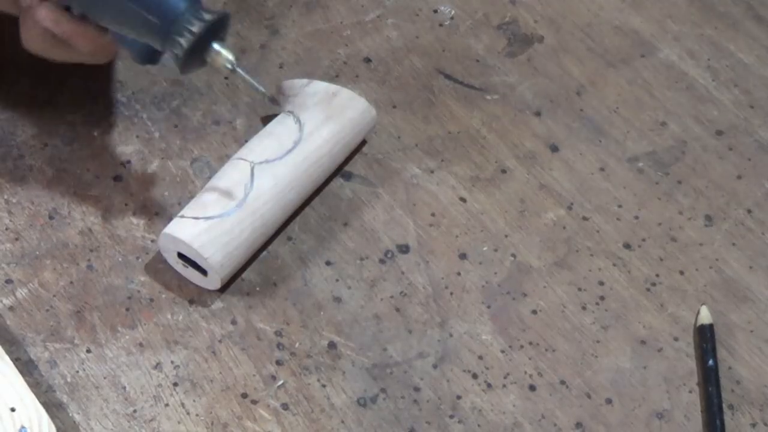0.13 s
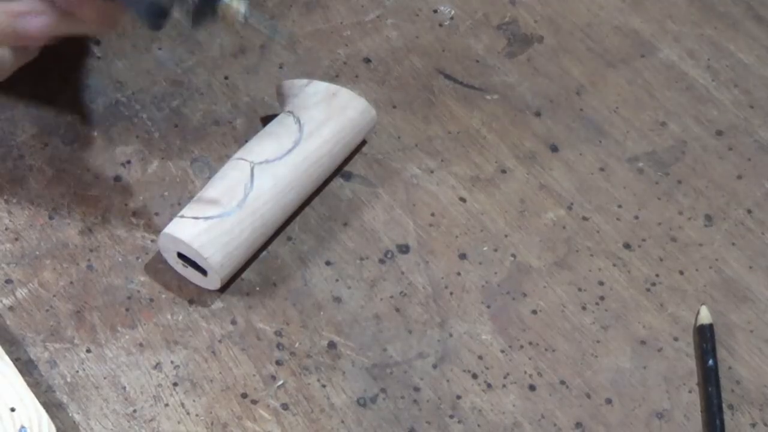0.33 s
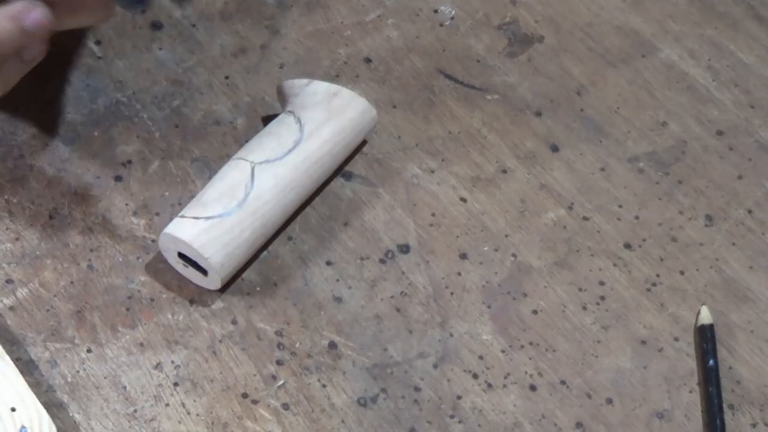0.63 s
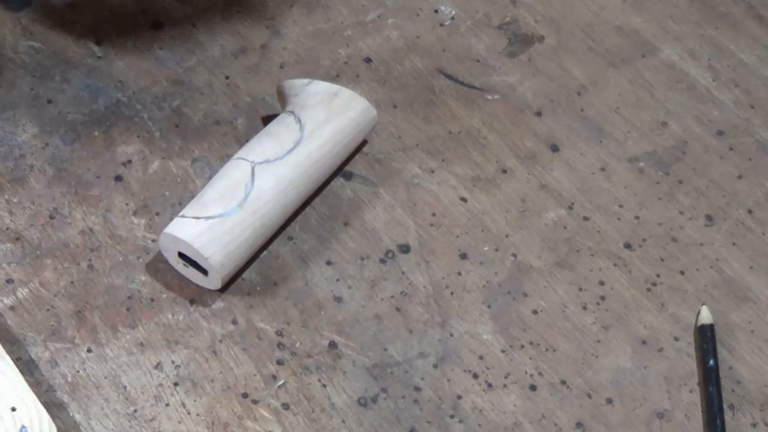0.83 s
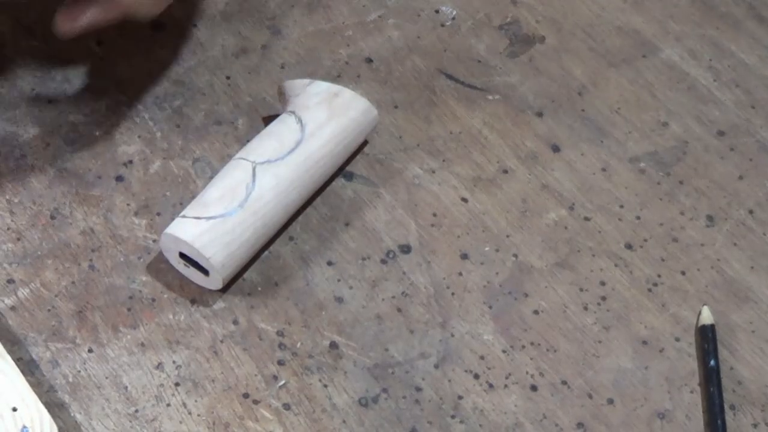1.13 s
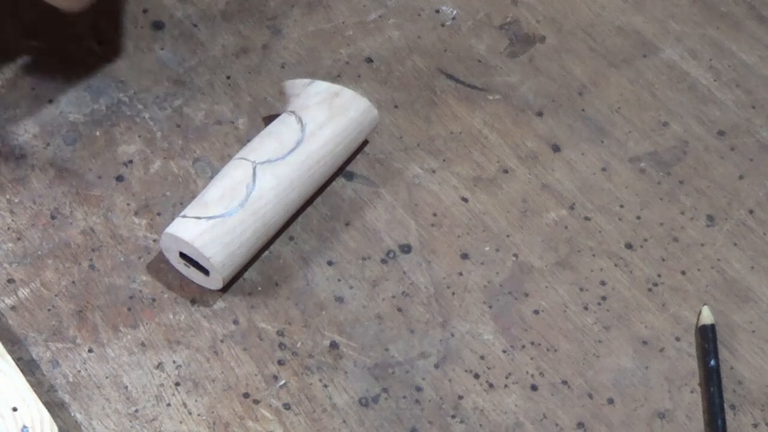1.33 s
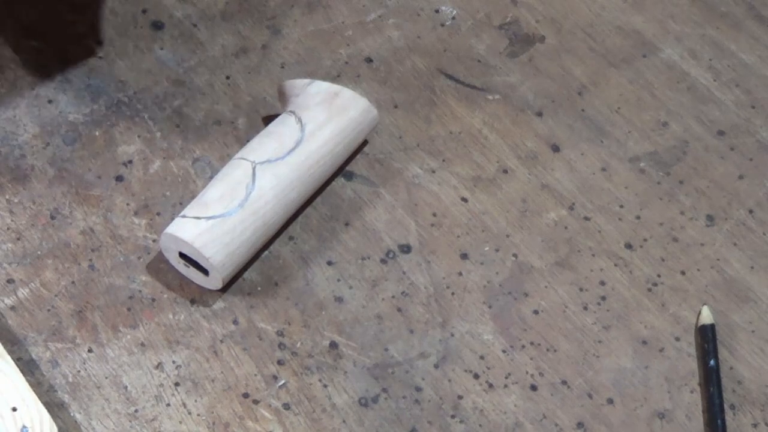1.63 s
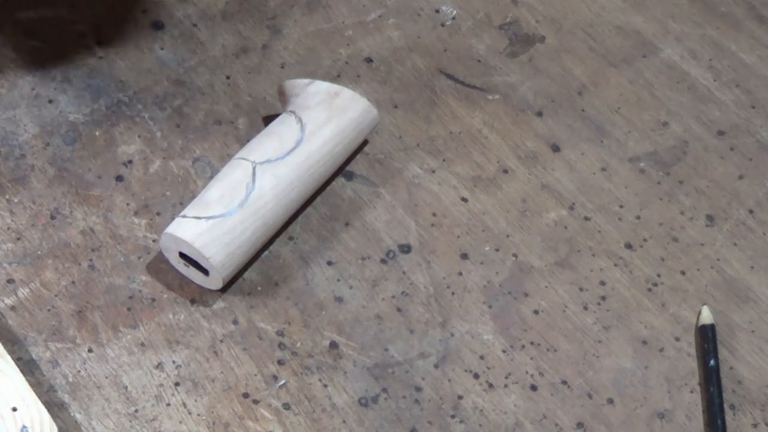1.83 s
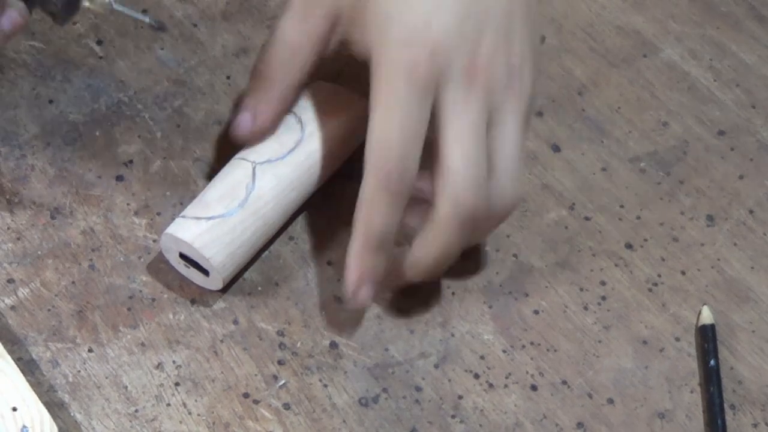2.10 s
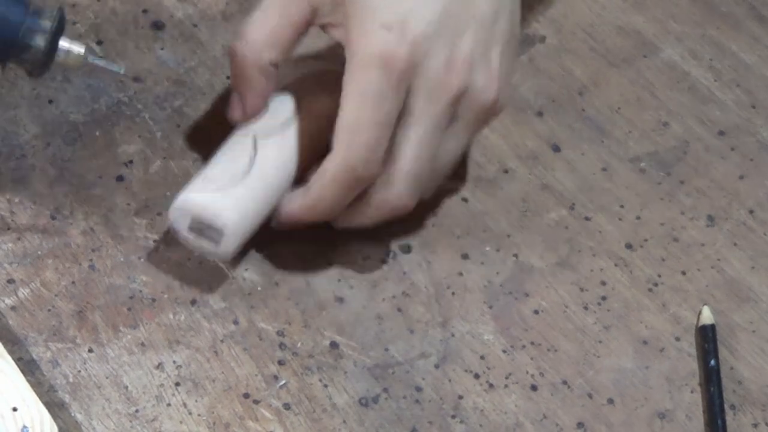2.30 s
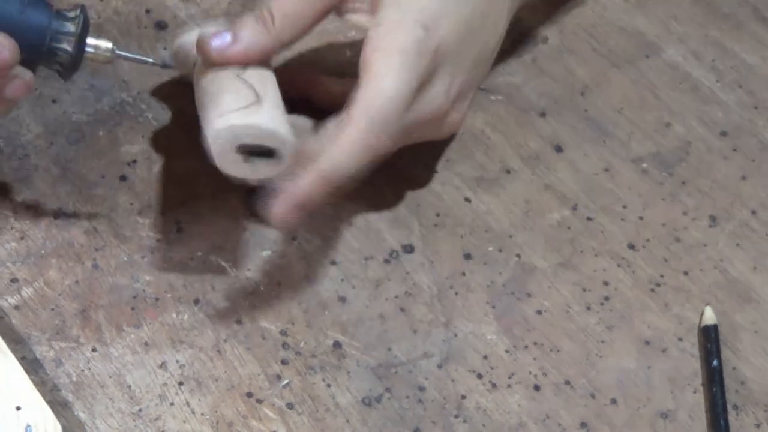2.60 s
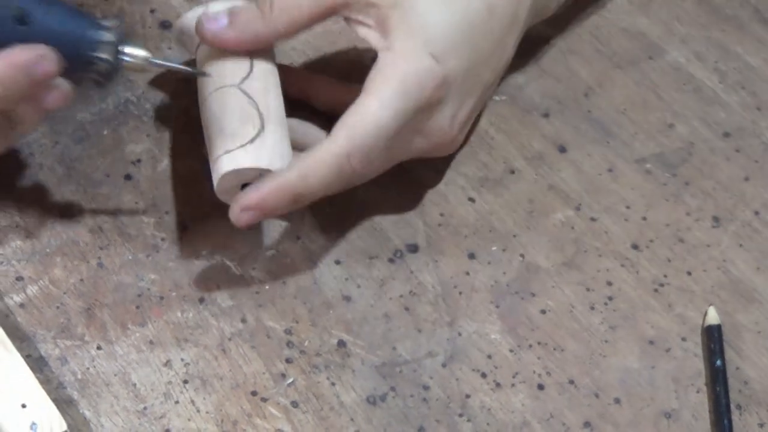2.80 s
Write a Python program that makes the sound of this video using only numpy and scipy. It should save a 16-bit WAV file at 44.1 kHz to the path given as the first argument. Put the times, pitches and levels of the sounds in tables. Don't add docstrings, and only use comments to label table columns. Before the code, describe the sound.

A small handheld rotary tool runs throughout, close and slightly left. Its motor whine climbs fast during the first second, then more slowly towards full speed by 2.9 s, wavering as the grip shifts. Bright fan and brush hiss dominates, with grainy bit chatter coming and going. Around 2.1-2.2 s several dull wooden knocks sound on the bench, a faint tap at 2.3 s. Faint workshop rumble and hum lie beneath.

```python
import sys
import numpy as np
from scipy import signal
from scipy.fft import rfft, irfft
from scipy.io import wavfile
from scipy.ndimage import uniform_filter1d

SR = 44100
rng = np.random.default_rng(int(sys.argv[2]) if len(sys.argv) > 2 else 0)


def output_pcm(signal):
    pcm = np.clip(np.atleast_2d(signal).T, -1, 1) * 32767
    wavfile.write(sys.argv[1], SR, np.round(pcm).astype(np.int16))


def volts_from_db(level):
    exponent = np.asarray(level, float) / 20
    return 10 ** exponent


N = 130095

# (time [s], shaft speed [Hz])
SPEED = [(0, 233.6), (.06, 248), (.14, 260.5), (.22, 272.6), (.31, 288.1), (.43, 299.9), (.59, 319),
         (.78, 330.8), (.93, 339.6), (1.07, 349.2), (1.18, 354.7), (1.4, 363), (1.66, 369.9), (1.91, 377.7),
         (2.23, 382.6), (2.55, 387.7), (2.95, 391.3)]
# (time [s], tool facing the microphones [dB], imbalance in the grip [dB],
# commutator whine [dB], bit chatter [dB], vents turned away [0-1], commutator overtone [dB])
HAND = [(0, -2, -34, -16, -9, 0, -18), (.17, -1, -20, -9, -3, 0.08, -3),
        (.34, -0.5, -11, -3, -1, 0.15, -12), (.55, 0.5, -14, -6, -5, 0.3, -8),
        (.7, 1.2, -9, -4, -8.5, 0.45, -15), (.8, 0.5, -2, -14, -6, 0.4, -8),
        (.9, -0.5, 2.5, -21, -4.5, 0.38, -1.5), (1.05, 1, 0, -1, 0, .7, -7),
        (1.2, 1.5, -10, 1.5, -8, 0.81, 3.5), (1.45, 1, -1.5, -5, -4, 0.68, 2.5),
        (1.9, 1, -1, 1, 1.5, 0.6, 1.5), (2.05, 1.5, -3, 4.5, -14, 0.7, 0.5), (2.38, 0, -2, 2, -4, 0.45, 1),
        (2.5, -1.65, 3, 7, 2, 0.2, 4.5), (2.78, 2, 3.5, 6.5, -1.5, 1, -0.5),
        (2.85, 1.5, 0.5, 3, -6, 0.7, 1.5), (2.95, 0.5, 4, 3, -2, 0.99, -2)]
# (multiple of shaft speed [1], level [dB])
ORDERS = [(3, -51.3), (4, -50), (5, -52.6), (6, -58.0), (7, -54.2), (9, -54.3), (10, -55.5), (11, -51.1),
          (12, -48.8), (13, -51.3), (14, -50.9), (15, -47), (17, -47), (18, -47.1), (19, -44.0),
          (20, -50.7), (21, -51.4), (22, -54), (23, -40.2), (24, -42.8), (25, -50.0), (26, -40.5),
          (27, -42.9), (28, -49.1), (29, -52.7), (30, -45.4), (31, -50.4), (32, -48.6), (33, -48.7),
          (34, -54.1), (35, -50.1), (36, -52.7), (37, -50.8), (38, -51.4), (39, -54.9), (40, -52.2),
          (41, -58.0), (42, -58.0)]
# (multiple of shaft speed [1], level [dB], column of HAND [index])
HELD_ORDERS = [(1, -47.5, 2), (8, -42, 3), (16, -38.5, 6)]
# (time [s], multiple of shaft speed [1], level [dB], half length [s])
FLARES = [(0.02, 22, -38, 0.04), (0.05, 7, -45, 0.08), (0.31, 18, -36.5, 0.11), (0.35, 32, -34.5, 0.07),
          (0.36, 26, -39.8, 0.04), (0.37, 31, -37.5, 0.07), (0.39, 25, -38.1, 0.07),
          (0.42, 28, -35.9, 0.04), (0.55, 17, -43, 0.05), (0.56, 16, -36.5, 0.05), (0.57, 32, -39.6, 0.11),
          (0.66, 26, -39.9, 0.11), (0.7, 4, -42, 0.035), (0.76, 33, -36.6, 0.04), (0.77, 22, -43.5, 0.17),
          (0.77, 30, -40.8, 0.11), (0.79, 27, -34.7, 0.04), (0.9, 28, -36.9, 0.25), (0.97, 25, -43.1, 0.25),
          (1.0, 24, -40.9, 0.17), (1.03, 23, -42.4, 0.11), (1.07, 27, -39.4, 0.25), (1.08, 32, -40.8, 0.11),
          (1.22, 17, -40.8, 0.11), (1.23, 29, -38.7, 0.11), (1.26, 18, -38.3, 0.17),
          (1.31, 27, -36.9, 0.04), (1.32, 15, -45, 0.07), (1.43, 24, -40.1, 0.11), (1.48, 23, -36.2, 0.04),
          (1.55, 4, -47, 0.2), (1.55, 19, -44.7, 0.25), (1.75, 7, -47, 0.25), (1.85, 15, -42, 0.3),
          (1.94, 31, -39.4, 0.07), (1.95, 24, -42.8, 0.17), (2.07, 23, -40.9, 0.04),
          (2.09, 32, -44.5, 0.17), (2.25, 3, -48, 0.2), (2.35, 23, -41.4, 0.17), (2.39, 26, -39.1, 0.11),
          (2.45, 21, -38.1, 0.11), (2.52, 30, -39.5, 0.17), (2.62, 20, -41.5, 0.25), (2.72, 17, -43, 0.15),
          (2.76, 3, -44.1, 0.25), (2.8, 20, -41, 0.04), (2.82, 21, -40.9, 0.25), (2.87, 23, -41.3, 0.11),
          (2.89, 20, -36.5, 0.17)]
# (frequency [Hz], density [dB per Hz])
HISS_OPEN = [(260, -39), (450, -16), (1290, -6), (1610, -12.5), (2300, -12), (2710, -6), (9270, 4.5),
             (13000, 1.5), (15600, -13)]
# (frequency [Hz], density [dB per Hz])
HISS_AWAY = [(260, -66), (450, -20), (1150, -8.5), (1950, -11.5), (2480, -18.5), (3050, -2.5), (3280, -3),
             (10100, -4.5), (15600, -12)]
# (frequency [Hz], width [Hz], lift [dB])
HOUSING = [(1090, 450, 5.5), (1945, 417, 7), (2500, 380, 2.5), (3950, 220, 3.5), (5960, 2400, -0.5),
           (9310, 1050, 2.5), (14400, 1330, 2.5)]
# (frequency [Hz], width [Hz], level [dB])
NOSE_MODES = [(3264, 290, -9), (3740, 730, 11), (4030, 450, 1.5), (1056, 990, 1), (1856, 330, 0)]
# (time [s], frequency ratio [1])
NOSE_PITCH = [
    (0, 1.02),
    (1.0, 0.85),
    (1.1, 0.91),
    (1.4, 1.02),
    (1.9, 1.04),
    (2.4, 0.97),
    (2.95, 0.98),
]
# (time [s], level [dB], bench pitch [Hz], T60 [s])
KNOCKS = [
    (2.117, -31.5, 204.9, 0.064),
    (2.134, -36, 120.1, 0.09),
    (2.178, -29, 235, 0.045),
    (2.186, -29, 274, 0.047),
    (2.205, -44, 197, 0.052),
    (2.216, -29.5, 298, 0.038),
    (2.334, -46, 266.5, 0.076),
]
# (frequency [Hz], density [dB per Hz])
RUMBLE = [(12, -50), (20, -18), (70, -8.5), (114, -6.5), (168, -7), (292, 0), (348, 0.5), (500, 3),
          (650, -18), (1100, -120)]
# (frequency [Hz], level [dB])
HUM = [(60, -81.5), (120, -63.5), (240, -69)]
# (frequency [Hz], coherence [0-1])
COHERENCE = [(60, .995), (180, .96), (500, .92), (1000, .89), (2200, .92), (4500, .88), (9500, .87),
             (13500, .97)]
# (frequency [Hz], left over right [dB])
LEAN = [(60, 0), (180, .1), (550, 1.3), (1650, 1.6), (3000, 1.9), (6000, 2.6), (9500, 2.8), (13500, 1)]

ORDER_DB, FLARE_DB = -1.3, -0.7
WANDER_DB, WANDER_HZ = 2.4, 8
FLUTTER, FLUTTER_HZ = 0.3, 60
HELD_LOOSENESS = 0.28
HISS_DB, PATCH_DB, FLICKER_DB = -28, 1.5, 0.3
THROB_HZ = 121.2
THROB_LOW, THROB_HIGH, TURN_DEPTH = 0.15, 0.067, 0.055
CHATTER_DB, CHATTER_PER_S, CHATTER_SPREAD_DB = -35.5, 2200, 2.5
KNOCK_RISE_S, KNOCK_SNAP_DB, KNOCK_SCUFF_DB, SCUFF_HZ = 0.004, -8, -5, 420
RUMBLE_DB = -58.5
EDGE_HZ = 15750


def read(points, hz):
    f, value = np.transpose(points)
    return np.interp(np.log(hz + 1), np.log(f + 1), value)


def evened(x):
    return x / np.sqrt(np.mean(x ** 2) + 1e-20)


def control(table, column, t):
    return np.interp(t, [row[0] for row in table], [row[column] for row in table])


def drift(top_hz, count):
    steps = N // 128 + 2
    hz = np.fft.rfftfreq(steps, 128 / SR)
    lowpass = (hz > 0) / (1 + (hz / top_hz) ** 4)
    slow = irfft(rfft(rng.standard_normal((count, steps))) * lowpass, steps)
    slow /= slow.std(1, keepdims=True)
    return np.array([np.interp(np.arange(N) / 128, np.arange(steps), row) for row in slow])


def resonate(x, hz, width):
    turn = np.exp(2j * np.pi * np.cumsum(hz) / SR)
    r = np.exp(-np.pi * width / SR)
    smooth = signal.lfilter([1], np.convolve([1, -r], [1, -r]), x / turn)
    return (turn * smooth).real


def shaft():
    speed = control(SPEED, 1, np.arange(N) / SR)
    hz = uniform_filter1d(speed, size=2000, mode="nearest")
    return hz, np.cumsum(hz) / SR


def whine(hz, turns):
    t, out = np.arange(N) / SR, np.zeros(N)
    rows = [(k, db + control(HAND, column, t), HELD_LOOSENESS) for k, db, column in HELD_ORDERS]
    rows += [(k, db + ORDER_DB, 1) for k, db in ORDERS]
    slow = drift(WANDER_HZ, len(rows))
    quick = drift(FLUTTER_HZ, len(rows))
    for i, (k, db, loose) in enumerate(rows):
        flare = 0
        for s, order, top_db, half in FLARES:
            if round(order) == k:
                flare = flare + volts_from_db(top_db + FLARE_DB) * np.exp(-((t - s) / half) ** 2)
        level = volts_from_db(db + loose * WANDER_DB * slow[i]) + flare
        level = level * (1 + np.sqrt(loose) * FLUTTER * quick[i])
        in_band = k * hz < EDGE_HZ
        out += level * in_band * np.sin(2 * np.pi * (k * turns + rng.random()))
    return out


def noise(shape_db):
    a, b = rng.standard_normal((shape_db.shape[1], 257, 2)).T
    return signal.istft((a + 1j * b) * volts_from_db(shape_db), nperseg=512, noverlap=384)[1][:N]


def hiss(turns):
    frames, hz = N // 128 + 5, np.fft.rfftfreq(512, 1 / SR)
    away = np.clip(control(HAND, 5, np.arange(frames) * 128 / SR), 0, 1)
    body = sum(db * np.exp(-((hz - f) / width) ** 2) for f, width, db in HOUSING)
    field = np.outer(read(HISS_OPEN, hz), 1 - away) + np.outer(read(HISS_AWAY, hz), away)
    field += body[:, None]

    patches = uniform_filter1d(rng.standard_normal((frames, 257)), size=40, axis=0)
    patches = evened(uniform_filter1d(patches, size=8, axis=1).T)
    flicker = evened(uniform_filter1d(rng.standard_normal((frames, 257)), size=80, axis=1).T)
    patchiness = 1 + np.outer((hz / 13000) ** 2, 1 - away)
    field += PATCH_DB * patchiness * patches + FLICKER_DB * flicker
    x = volts_from_db(HISS_DB) * evened(noise(field))

    low = signal.sosfilt(signal.butter(2, 2800, fs=SR, output="sos"), x)
    throb = np.cos(2 * np.pi * THROB_HZ * np.arange(N) / SR)
    turning = np.cos(2 * np.pi * turns)
    high = (x - low) * (1 + THROB_HIGH * throb + TURN_DEPTH * turning)
    return low * (1 + THROB_LOW * throb) + high


def chatter():
    t = np.arange(N) / SR
    ticks = rng.standard_normal(N)
    ticks *= volts_from_db(CHATTER_SPREAD_DB * np.minimum(rng.exponential(1, N), 2))
    ticks *= rng.random(N) < CHATTER_PER_S / SR
    ticks *= 1 + 0.19 * np.cos(2 * np.pi * THROB_HZ * t)
    pitch = control(NOSE_PITCH, 1, t)
    ring = sum(volts_from_db(db) * evened(resonate(ticks, f * pitch, width)) for f, width, db in NOSE_MODES)
    ring = signal.sosfilt(signal.butter(3, 700, "high", fs=SR, output="sos"), ring)
    return volts_from_db(CHATTER_DB + control(HAND, 4, t)) * evened(ring)


def knocks():
    out, t = np.zeros(N), np.arange(SR // 4) / SR
    for s, db, hz, t60 in KNOCKS:
        scuff = evened(resonate(rng.standard_normal(len(t)), np.full(len(t), SCUFF_HZ), SCUFF_HZ))
        ring = np.sin(2 * np.pi * hz * t)
        ring += volts_from_db(KNOCK_SNAP_DB - 60 * t / t60) * np.sin(2 * np.pi * 1.64 * hz * t)
        ring += volts_from_db(KNOCK_SCUFF_DB) * scuff
        blow = volts_from_db(db - 60 * t / t60) * (1 - np.exp(-t / KNOCK_RISE_S)) * ring
        part = out[round(s * SR):][:len(t)]
        part += blow[:len(part)]
    return out


def floor():
    hz, t = np.fft.rfftfreq(N, 1 / SR), np.arange(N) / SR
    rumble = irfft(rfft(rng.standard_normal(N)) * volts_from_db(read(RUMBLE, hz)), N)
    sway = drift(9.8, len(HUM))
    hum = np.zeros(N)
    for i, (f, db) in enumerate(HUM):
        hum += volts_from_db(db - 1.0 + 0.32 * sway[i]) * np.sin(2 * np.pi * f * t + i)
    return volts_from_db(RUMBLE_DB) * evened(rumble) + hum


def pair(x):
    hz, t = np.fft.rfftfreq(N, 1 / SR), np.arange(N) / SR
    room = rfft(rng.standard_normal(N) * volts_from_db(-60 * t / 0.27))
    room /= np.sqrt(uniform_filter1d(abs(room) ** 2, size=600))
    apart = np.sqrt((1 - np.clip(read(COHERENCE, hz), 0, 0.999)) / 2) * room
    lean = volts_from_db(read(LEAN, hz) / 2)
    return irfft(rfft(x) * np.array([(1 + apart) * lean, (1 - apart) / lean]), N)


def scene():
    hz, turns = shaft()
    facing = volts_from_db(control(HAND, 1, np.arange(N) / SR))
    tool = (whine(hz, turns) + hiss(turns) + chatter()) * facing
    return pair(tool + floor() + knocks())


def top_cut(x):
    return signal.sosfilt(signal.butter(12, 15720, fs=SR, output="sos"), x)


def record(dry):
    lowpass = signal.firwin(511, EDGE_HZ, window=("kaiser", 9), fs=SR)
    mix = signal.oaconvolve(dry, lowpass[None], "same")
    return top_cut(mix)


dry = scene()
out = record(dry)
output_pcm(out)
```